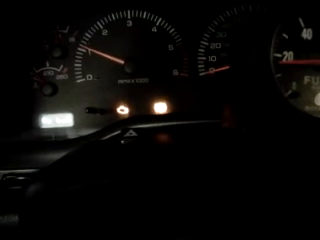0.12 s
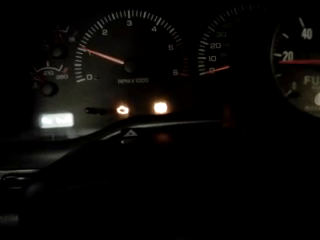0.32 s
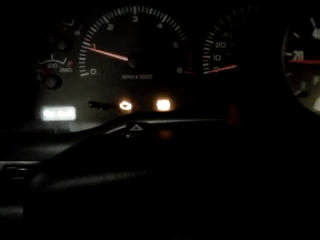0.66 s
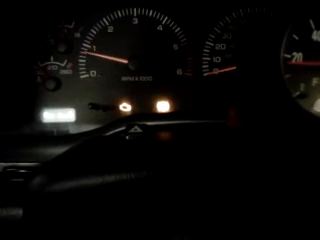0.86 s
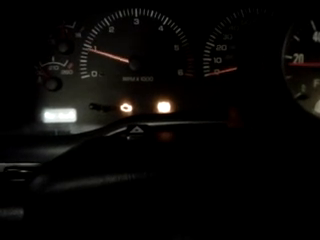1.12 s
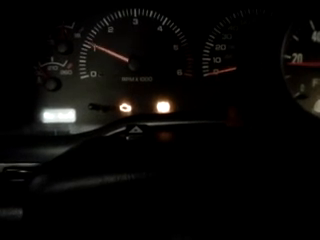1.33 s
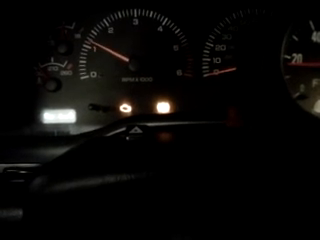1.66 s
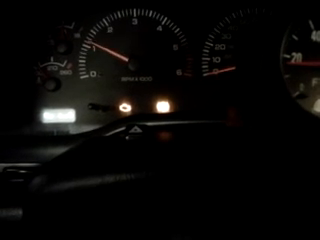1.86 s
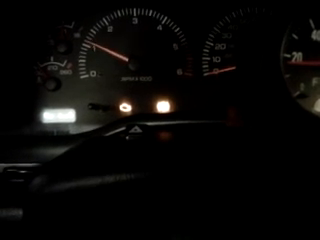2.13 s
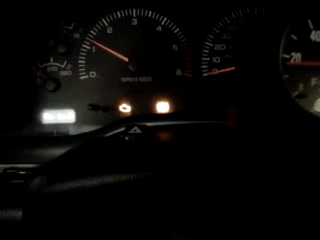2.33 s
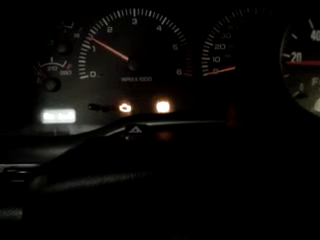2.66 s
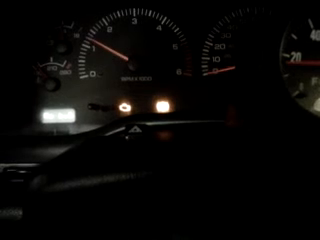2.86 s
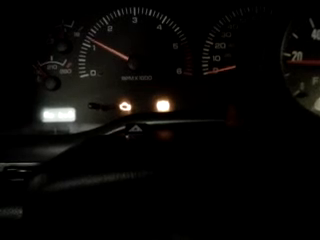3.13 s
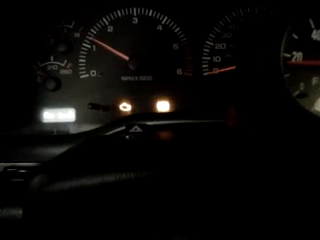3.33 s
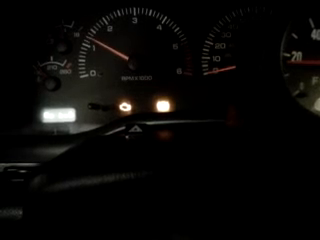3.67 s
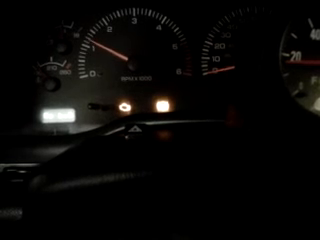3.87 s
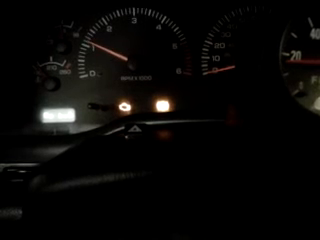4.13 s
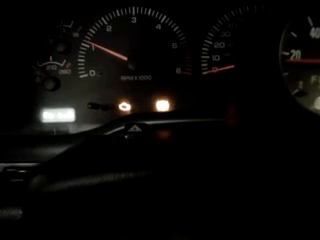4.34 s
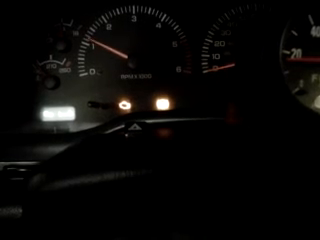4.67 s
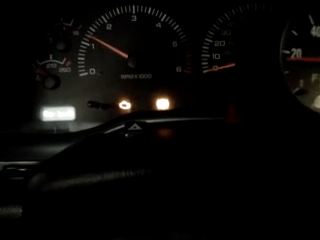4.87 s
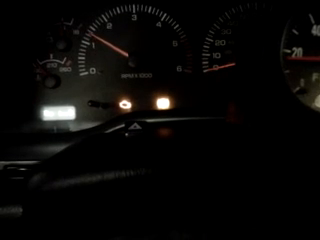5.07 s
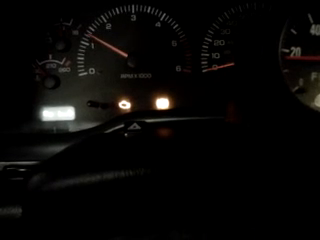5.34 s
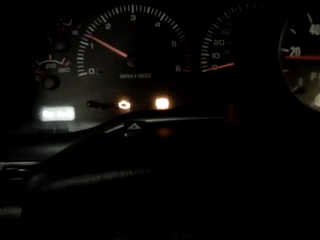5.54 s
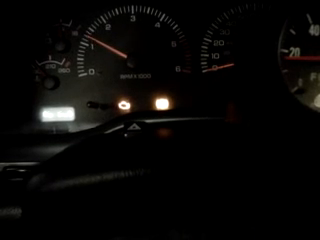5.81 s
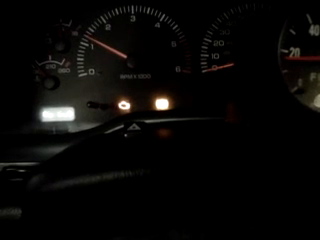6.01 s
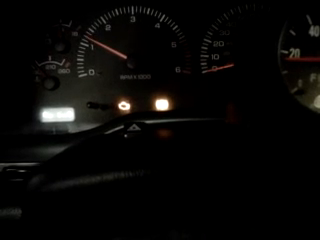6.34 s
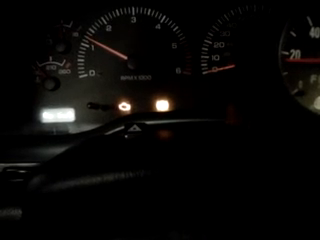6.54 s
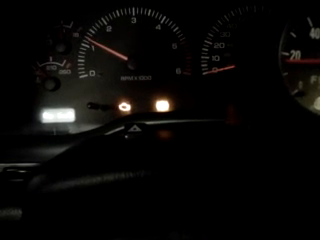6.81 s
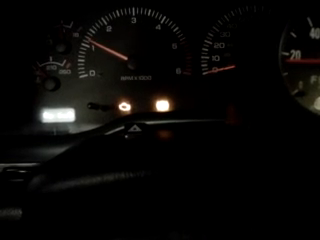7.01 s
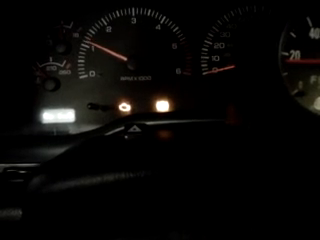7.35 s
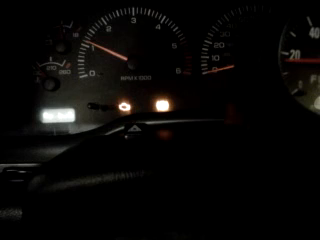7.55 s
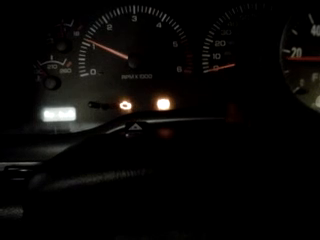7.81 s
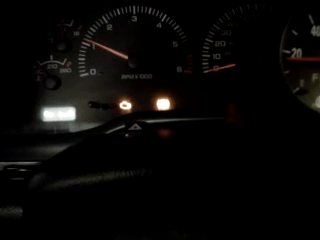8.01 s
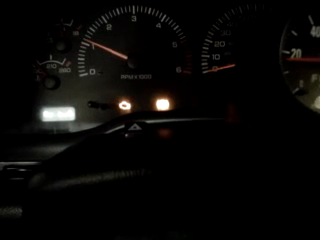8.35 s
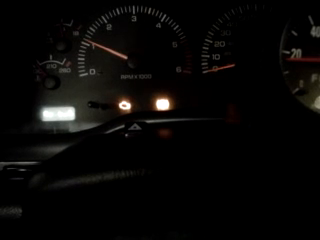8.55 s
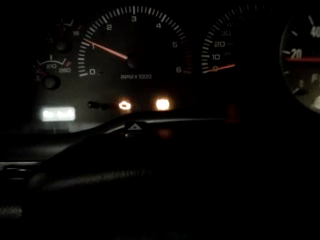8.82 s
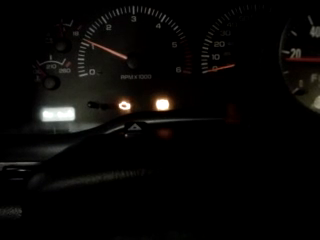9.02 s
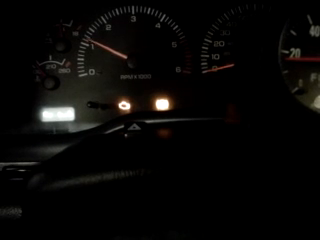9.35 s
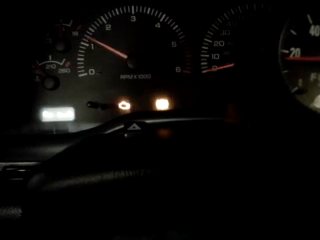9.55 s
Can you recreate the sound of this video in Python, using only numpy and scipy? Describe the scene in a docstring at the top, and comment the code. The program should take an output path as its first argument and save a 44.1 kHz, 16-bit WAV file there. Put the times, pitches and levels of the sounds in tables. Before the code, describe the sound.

Inside a dark cab, a diesel engine idles unsteadily, its deep boom sagging and surging with clatter, trim rattles and one small sharp tick.

```python
"""A deep boom swells and lapses in a cab as a six-cylinder diesel hunts around a fast idle: speed sags,
fuel surges in, speed climbs. The boom is three tones at multiples of the firing rate; unequal cylinders
add crank lines between them, and firing pulses and noise ring the cab as a thud. Filtered noise makes clatter,
knock and intake rush; rough bursts ring the chamber, wavering tones hum, taps rattle trim, one tick snaps."""
import sys
import numpy as np
from scipy import signal
from scipy.fft import rfft, irfft, next_fast_len
from scipy.io import wavfile
from scipy.ndimage import uniform_filter1d

SR = 44100
rng = np.random.default_rng(int(sys.argv[2]) if len(sys.argv) > 2 else 0)


def nominal_scale(level):
    """Amplitude ratio for a level in decibels (scalar or array-like)."""
    x = np.asarray(level, float) / 20
    return 10 ** x


def generate_wav(sig):
    """Save sig (samples, or channels by samples) to the path in sys.argv[1] as 16-bit PCM at SR."""
    pcm = np.round(np.clip(np.atleast_2d(sig).T, -1, 1) * 32767).astype(np.int16)
    wavfile.write(sys.argv[1], SR, pcm)


N = 426876
TIME, FFT_SIZE = np.arange(N) / SR, next_fast_len(N)  # s, points
FREQ = np.arange(FFT_SIZE // 2 + 1) * SR / FFT_SIZE + 1e-3  # Hz, kept above zero for the logarithms


def level(x, db):
    """Level normalisation: scale to an rms level in dB."""
    return x * nominal_scale(db) / np.sqrt(np.mean(x ** 2))


def curve(table):
    """Linear interpolation: each column after the time becomes one value per sample."""
    s, *columns = np.transpose(table)
    return [np.interp(TIME, s, c) for c in columns]


def walk(rate):
    """Random modulation: normal values held for 1 / rate seconds, then slewed; spread near 1."""
    hold = int(SR / rate)
    steps = np.repeat(rng.standard_normal(N // hold + 1), hold)
    return uniform_filter1d(steps, hold)[:N]


def swell(s, half):
    """Gaussian envelope: a bell-shaped rise and fall around s."""
    return np.exp(-((TIME - s) / half) ** 2)


def ring(x, modes):
    """Modal superposition: damped resonances in parallel, with alternating sign."""
    gain = 0
    for k, (hz, width, db) in enumerate(modes):
        resonance = 1j * FREQ * width / (hz ** 2 - FREQ ** 2 + 1j * FREQ * width)
        gain = gain + (-1) ** k * nominal_scale(db) * resonance
    return irfft(rfft(x, FFT_SIZE) * gain, FFT_SIZE)[:N]


# Engine speed: start_s [s], firing_rate_hz [Hz]
SPEED = [(0, 56.13), (.27, 53.33), (.67, 38.83), (.89, 33.92), (1.02, 40.02), (1.16, 56.18), (1.3, 68.96),
         (1.51, 67.9), (1.64, 62.54), (2.08, 54.4), (2.18, 57.66), (2.29, 66.9), (2.42, 69.44),
         (2.88, 63.1), (3.07, 59.3), (3.21, 60.25), (3.4, 68.2), (4.23, 54.57), (4.5, 54.5), (4.72, 60.2),
         (4.96, 69.2), (5.61, 63.3), (6.33, 59.97), (6.71, 60.4), (7.6, 55.27), (8.65, 54.75), (9.0, 56.8),
         (9.68, 63.8)]


def firing_phase():
    """Phase is the integral of frequency: firings elapsed, three to a crank turn."""
    (hz,) = curve(SPEED)
    return hz, np.cumsum(hz) / SR


# Fuel surges: full_s [s], climb_s [s], hold_s [s], lift_db [dB, before each source's share]
SURGES = [(1.128, 0.16, 0.13, 13.5), (2.218, 0.082, 0.089, 14), (3.315, 0.36, 0.044, 6.5),
          (4.853, 0.61, 0.07, 6.5), (9.668, .2, 0.03, 1)]
RELEASE_S = 0.18
BLOCK_LEAD_S = 0.032  # block and chamber answer this much earlier


def surge(lead_s=0):
    """Forced response to fuel: a lift in dB climbs, holds and dies away; a lead keeps its end in place."""
    lift_db = 0
    for s, climb, hold, db in SURGES:
        corners = [s - climb, s, s + hold, s + hold + RELEASE_S + lead_s]
        lift_db = lift_db + np.interp(TIME + lead_s, corners, [0, db, db, 0])
    return lift_db


# Swell of the boom: start_s [s], level_db [dB], extra_lowest_tone_db [dB]
BOOM = [(0, -44, 2), (.25, -31, 3), (.5, -38, -6), (.67, -47, 10), (.9, -37.5, -3.5), (1.2, -31.5, 10),
        (1.35, -32.5, -17), (1.47, -25, -4), (1.72, -46, -2), (2.05, -36.5, 7), (2.3, -27, -8),
        (2.85, -30.5, 2.5), (3.05, -39, -1), (3.25, -39, 9), (3.47, -47.5, 6), (3.55, -26, -5),
        (4.0, -46, -9), (4.5, -37.5, -1), (5.0, -31, -2), (5.45, -29, -2), (5.7, -35, -3), (6.5, -30.5, -6),
        (6.9, -45.5, 6), (7.25, -34, 0.5), (8.3, -39.5, 4.5), (9.0, -37, 2.5), (9.68, -33, -3)]
# How the cab passes a boom tone: pitch_hz [Hz], gain_db [dB]
BOOM_PATH = [(34, 8), (42, -4), (50, -5.5), (58, -9.5), (67, -0.5), (85, 5.5), (110, 0.5), (122, -1),
             (138, -10.5), (150, -8), (165, -7), (173, -17.5), (185, -2.5), (194, -0.5), (202, 1.5),
             (210, -4)]
# Jolts as the engine catches: centre_s [s], half_length_s [s], lift_db [dB, before each tone's share]
JOLTS = [(1.114, 0.075, 21), (1.266, 0.037, 16), (2.186, 0.058, 19), (3.338, 0.083, 8.5), (4.332, 0.1, 22),
         (4.63, 0.064, 18.5), (4.882, 0.074, 13), (8.663, 0.17, 12.5), (9.254, 0.091, 14.5)]
# Jolts reaching 1x, 2x and 3x the firing rate: delay_s [s], share [ratio of the lift]
JOLT_REACH = [(-0.0014, 1), (-0.036, 0.49), (0.087, 0.31)]


def boom_levels(hz):
    """Transfer function: each tone sums swell, jolts and the cab's answer at its pitch, in dB."""
    level_db, lowest_db = curve(BOOM)
    path_hz, path_db = np.transpose(BOOM_PATH)
    levels_db = []
    for k, (delay, share) in enumerate(JOLT_REACH, 1):
        jolt_db = sum(db * swell(s + delay, length) for s, length, db in JOLTS)
        cab_db = np.interp(np.log(k * hz), np.log(path_hz), path_db)
        levels_db.append(level_db + (k == 1) * lowest_db + share * jolt_db + cab_db)
    return levels_db


def boom(phase, levels_db):
    """Harmonics of a periodic force: tones at 1x, 2x and 3x the firing rate, shaken by uneven combustion."""
    shaken = phase + 0.028 * walk(25)  # jitter in firing periods
    out = np.zeros(N)
    for k, db in enumerate(levels_db, 1):
        tone = np.sin(2 * np.pi * (k * shaken + rng.random()))
        out += np.sqrt(2) * nominal_scale(db + 2.5 * walk(20)) * tone
    return out


# Cab and exhaust resonances: pitch_hz [Hz], width_hz [Hz], relative_level_db [dB]
CAB = [(28, 41, -10), (54.6, 28, -2), (82, 15, 1.5), (102.4, 40, -3), (165.8, 16.3, 0.5), (202.4, 6.8, 3.5),
       (233.2, 18, -1), (280.4, 102, -7.5), (367, 14, -2), (413, 19.3, -6), (585, 34, -14), (668, 44, -9.5)]


def cab(x):
    """Cavity resonance: the cab and exhaust modes ring."""
    return ring(x, CAB)


# Lines between the booms: order [multiples of the crank turn rate], relative_level_db [dB]
CRANK = [(2.5, -3.5), (3.5, -2), (4, 0.5), (5, 4), (5.5, -4), (8, -3), (10, 2.5), (11, -12), (12, 0),
         (13, -3.5), (16, -5), (17, -7), (18, -9)]


def uneven(phase, uneven_db):
    """Subharmonics: unequal cylinders repeat with the crank; wavering lines pass through cab resonances."""
    lines = np.zeros(N)
    for order, db in CRANK:
        tone = np.sin(2 * np.pi * (order * phase / 3 + rng.random()))
        lines += nominal_scale(db + 2.5 * walk(6)) * tone
    return nominal_scale(uneven_db) * level(cab(lines), 0)


def firings(phase, scatter):
    """Impulsive excitation: one pulse per firing, each of its own strength."""
    at = np.flatnonzero(np.diff(np.floor(phase)))
    pulses = np.zeros(N)
    pulses[at] = 1 + scatter * rng.standard_normal(len(at))
    return pulses


def thud(phase, thud_db):
    """Impulse response: firings ring the cab over a noise-driven rumble."""
    rumble = level(cab(rng.standard_normal(N)), 1.0)
    beats = level(cab(firings(phase, scatter=1.0)), -3.5)
    return nominal_scale(thud_db) * (beats + rumble)


# Narrow rings of block and bulkhead: pitch_hz [Hz], width_hz [Hz], lift_db [dB]
RINGS = [(564.4, 10, 8), (671, 14, 6), (801.7, 26, 7.5), (1063, 20, 5), (1154, 22, 3), (1355, 21, 4.5),
         (1887, 45, 4), (2174, 48, 4.5), (2840, 55, 5)]


def colour(x, points):
    """Spectral shaping: filter through (Hz, dB) points on a log axis, lifted at the narrow rings."""
    hz, db = np.transpose(points)
    lift_db = sum(up / (1 + (2 * (FREQ - f) / w) ** 2) for f, w, up in RINGS)
    gain = nominal_scale(lift_db + np.interp(np.log(FREQ), np.log(hz), db))
    return irfft(rfft(x, FFT_SIZE) * gain, FFT_SIZE)[:N]


def clatter(phase, points, db, gate, flicker_db):
    """Amplitude-modulated noise: stronger just after each firing; third-octave bands clump independently."""
    pulse = 1 + gate * np.exp(-(phase % 1) / 0.4) * nominal_scale(3.5 * walk(60))
    noise = colour(pulse * rng.standard_normal(N), points)
    spectrum = rfft(level(noise, 0), FFT_SIZE)
    third = np.clip(3 * np.log2(FREQ / 300), 0, 13)  # third-octaves above 300 Hz
    out = np.zeros(N)
    for k in range(14):
        overlap = np.clip(1 - np.abs(third - k), 0, 1)
        band = irfft(spectrum * overlap, FFT_SIZE)[:N]
        out += nominal_scale(flicker_db * walk(11)) * band
    return nominal_scale(db) * out


# Engine block through the bulkhead: pitch_hz [Hz], relative_density_db [dB per Hz]
BLOCK = [(60, -29.5), (300, -8), (480, -7.5), (800, -4), (1170, -1), (1380, -4), (1490, -10), (2180, -9),
         (2700, -14), (3700, -20), (8000, -49.5)]


def block_clatter(phase, db):
    """Structure-borne transmission: block noise arrives through the bulkhead."""
    return clatter(phase, BLOCK, db, gate=0.4, flicker_db=1.5)


# Injection knock and hiss: pitch_hz [Hz], relative_density_db [dB per Hz]
KNOCK = [(1500, -24.5), (2800, -8.5), (3700, -7), (3950, -6), (4250, 2), (4800, -4), (6000, -8),
         (7200, -12.5)]


def knock(phase, db):
    """Combustion noise: injection knock and hiss concentrate in the treble."""
    return clatter(phase, KNOCK, db, gate=0.19, flicker_db=1.14)


# Ring of the burning charge: pitch_hz [Hz], width_hz [Hz], relative_level_db [dB]
CHAMBER = [(4011, 70, 0)]


def rasp(phase, lift_db):
    """Chamber resonance: under load the charge lights hard and a short rough burst per firing rings it."""
    decay = np.exp(-1 / (0.006 * SR))  # 6 ms burst
    burst = signal.lfilter([1], [1, -decay], np.abs(firings(phase, scatter=0.3)))
    rings = ring(burst * rng.standard_normal(N), CHAMBER)
    return nominal_scale(2.2 * (lift_db - lift_db.max())) * level(rings, -32)


# Intake air rushing under load: pitch_hz [Hz], relative_density_db [dB per Hz]
RUSH = [(1500, -7.5), (3300, -2.5), (7200, -4)]


def rush(phase, lift_db):
    """Flow noise: intake air grows steeply with load, to -33.5 dB before flicker at the strongest surge."""
    return clatter(phase, RUSH, -33.5 + 2 * (lift_db - lift_db.max()), gate=0.3, flicker_db=3.5)


# Brief hums: centre_s [s], half_length_s [s], pitch_hz [Hz], level_db [dB]. Most are cab panels; the 330 Hz row
# at 8.8 s strengthens the engine's crank line of order 18.
HUMS = [(1.1, 0.041, 186, -21), (1.247, 0.071, 187, -23), (1.224, 0.089, 238, -27.5),
        (1.2, 0.14, 286.6, -32), (1.21, .04, 362, -27), (1.25, 0.061, 462, -32), (2.454, 0.12, 368, -37.5),
        (2.881, 0.044, 408, -32.5), (3.428, 0.065, 368, -31), (4.71, 0.031, 184, -28.5),
        (5.052, 0.19, 368, -38.5), (5.502, 0.14, 407, -36.5), (5.503, .2, 364, -38.5),
        (6.456, 0.14, 408, -41.5), (7.199, 0.23, 366, -37), (8.206, 0.11, 366, -41),
        (8.796, 0.27, 330, -39.5), (9.618, 0.092, 370, -40)]


def hums():
    """Panel vibration: each hum is a tone that wavers in pitch and strength; one of them adds to a crank line."""
    drift = np.cumsum(1 + 0.012 * walk(30)) / SR  # seconds, unevenly paced
    shake = nominal_scale(2.2 * walk(25))
    out = np.zeros(N)
    for s, half, hz, db in HUMS:
        tone = np.sin(2 * np.pi * (hz * drift + rng.random()))
        out += np.sqrt(2) * nominal_scale(db) * swell(s, half) * shake * tone
    return out


# Rattles of loose trim: centre_s [s], half_length_s [s], level_db [dB]
RATTLES = [(1.0, 0.04, -30), (1.16, 0.044, -28), (1.32, 0.12, -29.5), (2.12, 0.027, -32),
           (2.22, 0.042, -25), (2.35, 0.04, -26.5), (3.21, 0.038, -28.5), (3.3, 0.055, -31),
           (3.38, 0.044, -35), (4.82, 0.16, -31), (7.78, 0.1, -33), (8.419, 0.028, -32),
           (8.509, 0.036, -30.5)]
# What the trim rings with: pitch_hz [Hz], width_hz [Hz], relative_level_db [dB]
TRIM = [(820, 130, -5), (1090, 97, -5), (1170, 55, -2.5), (1364, 110, -2)]


def rattles():
    """Random impact excitation: irregular taps of unequal size ring the trim, its modes applied twice."""
    struck = rng.random(N) < 500 / SR  # 500 taps a second on average
    taps = struck * rng.standard_normal(N) * nominal_scale(2.5 * walk(70))
    trim = level(ring(ring(taps, TRIM), TRIM), 0)
    return trim * sum(nominal_scale(db) * swell(s, half) for s, half, db in RATTLES)


# Tick near the microphone: start_s [s], peak_level_db [dB]
TICKS = [(7.9122, -12.5)]


def ticks():
    """Transient decay: two short damped treble tones, high-passed, make a bright snap."""
    out, t = np.zeros(N), np.arange(300) / SR
    snap = np.exp(-t / 0.00034) * np.sin(2 * np.pi * 5600 * t)
    snap = snap + 0.7 * np.exp(-t / 0.0014) * np.sin(2 * np.pi * 4400 * t)
    snap = signal.sosfilt(signal.butter(6, 3850., "high", fs=SR, output="sos"), snap)
    for s, db in TICKS:
        out[int(s * SR):][:len(t)] += nominal_scale(db) * snap / np.abs(snap).max()
    return out


# Levels between surges: start_s [s], block_clatter_db [dB], knock_db [dB], thud_db [dB], unevenness_db [dB]
IDLE = [(0, -30.5, -41, -37, -43), (.5, -31.5, -41, -33, -55), (.63, -32, -44.5, -40, -48),
        (.93, -29, -46.5, -39.5, -35.5), (1.45, -30.5, -38.5, -37, -32), (2.1, -30, -41.5, -34, -39.5),
        (2.6, -30.5, -38, -34.5, -34.5), (3.15, -32, -43, -36, -44), (3.8, -31, -42.5, -33, -42),
        (4.5, -29.5, -39, -39.5, -39), (5.3, -31, -40, -35, -33.5), (6.0, -28.5, -38, -37, -35),
        (6.7, -29.5, -38.5, -32, -36), (6.85, -31, -41.5, -39.5, -33.5), (7.3, -29.5, -38.5, -38, -30),
        (7.75, -28, -37.5, -41, -38.5), (8.5, -27.5, -37.5, -38.5, -42), (9.68, -27.5, -36.5, -36, -29)]
# Share of a surge's lift in dB that reaches each source
KNOCK_SHARE, BLOCK_SHARE, THUD_SHARE, UNEVEN_SHARE = 0.93, 0.44, 0.86, 0.75


def scene():
    """Linear superposition: all sources add, most of them following one firing phase."""
    hz, phase = firing_phase()
    lift_db, early_lift_db = surge(), surge(BLOCK_LEAD_S)
    block_db, knock_db, thud_db, uneven_db = curve(IDLE)
    mix = boom(phase, boom_levels(hz))
    mix += uneven(phase, uneven_db + UNEVEN_SHARE * lift_db)
    mix += thud(phase, thud_db + THUD_SHARE * lift_db)
    mix += block_clatter(phase, block_db + BLOCK_SHARE * early_lift_db)
    mix += knock(phase, knock_db + KNOCK_SHARE * lift_db)
    mix += rasp(phase, early_lift_db)
    mix += rush(phase, lift_db)
    mix += hums() + rattles() + ticks()
    return mix[None]


def low_pass(x):
    """Removes everything above the highest recorded frequency."""
    return signal.sosfilt(signal.butter(12, 7910, fs=SR, output="sos"), x)


def record(dry):
    """Band limiting and soft saturation: the phone cuts deep bass, flattens loud peaks and stops the top."""
    x = signal.sosfilt(signal.butter(1, 30., "high", fs=SR, output="sos"), dry)
    x = x / (1 + (x / 0.3) ** 4) ** (1 / 4)  # approaches 0.3 of full scale
    x = signal.sosfilt(signal.ellip(16, 0.2, 100, 7230, fs=SR, output="sos"), x)  # band edge in Hz
    return low_pass(x)


dry = scene()
out = record(dry)
generate_wav(out)
```